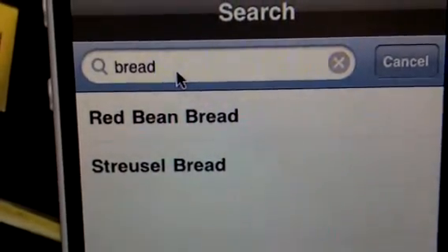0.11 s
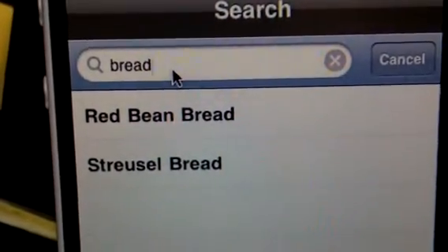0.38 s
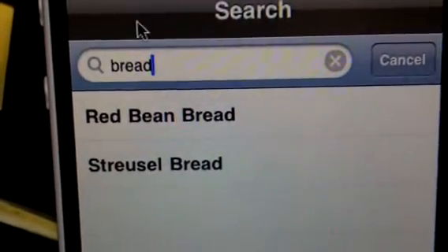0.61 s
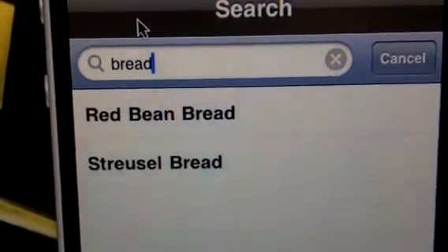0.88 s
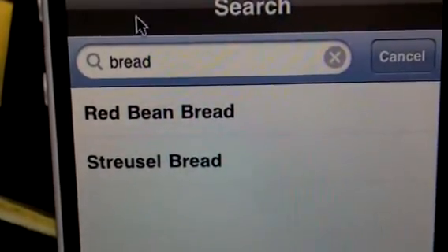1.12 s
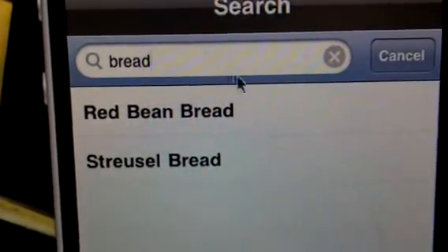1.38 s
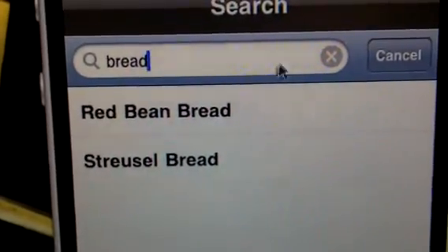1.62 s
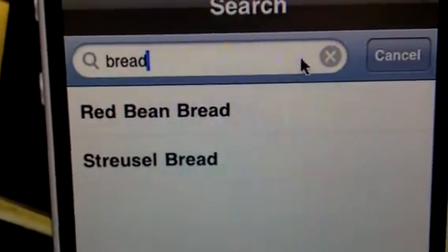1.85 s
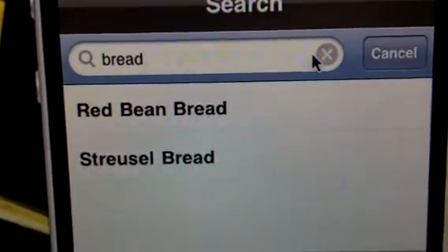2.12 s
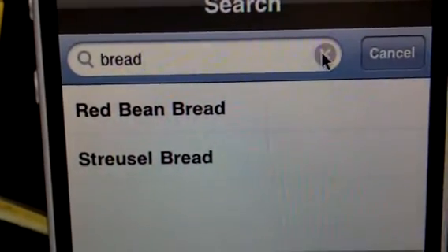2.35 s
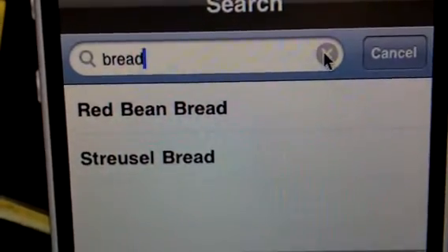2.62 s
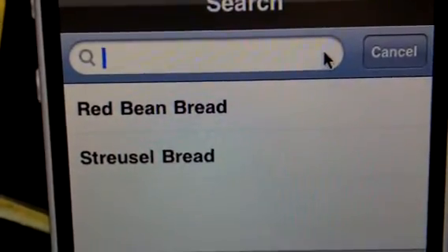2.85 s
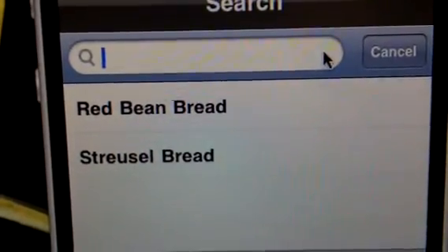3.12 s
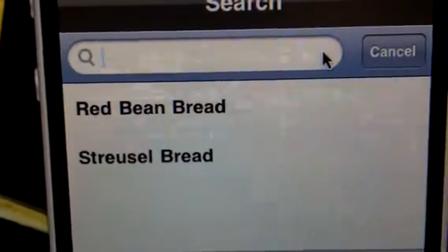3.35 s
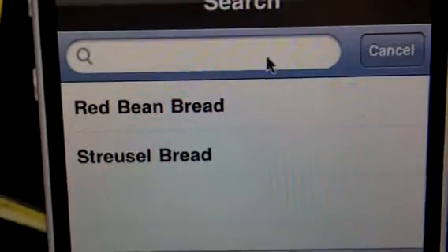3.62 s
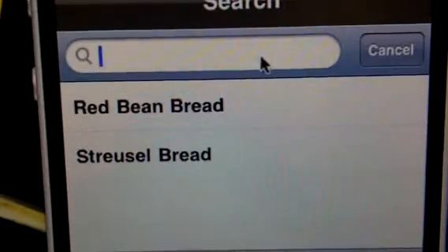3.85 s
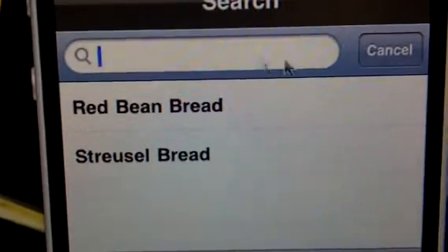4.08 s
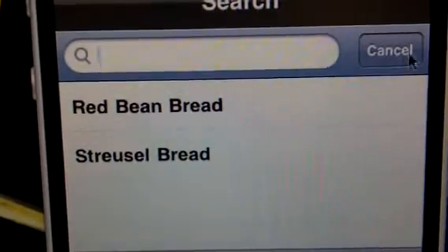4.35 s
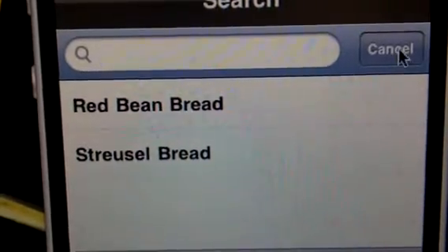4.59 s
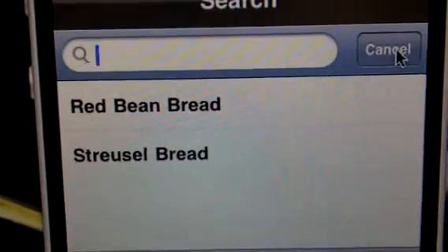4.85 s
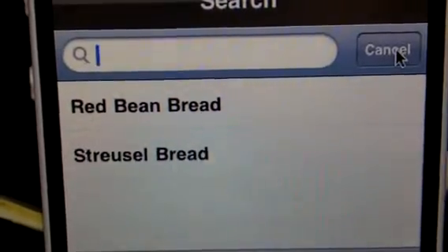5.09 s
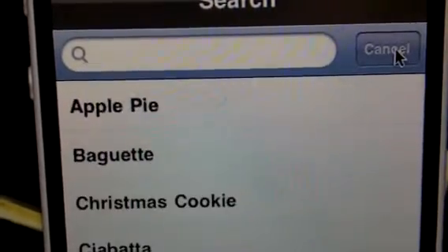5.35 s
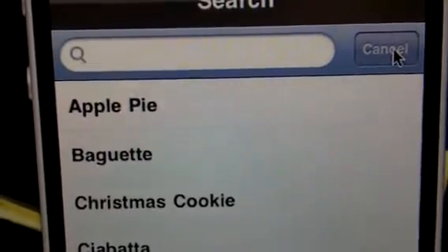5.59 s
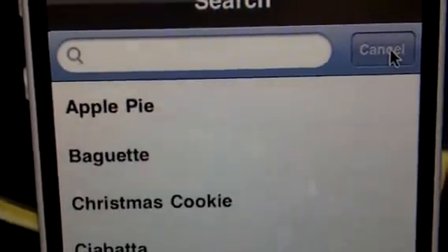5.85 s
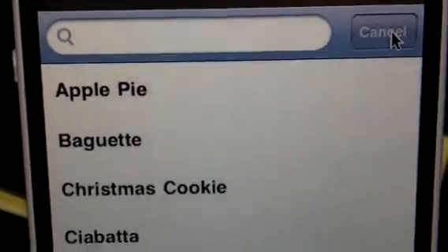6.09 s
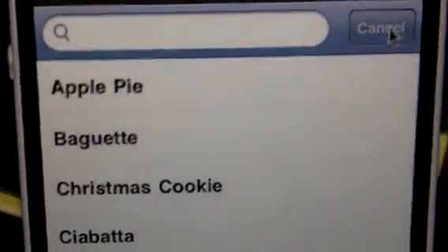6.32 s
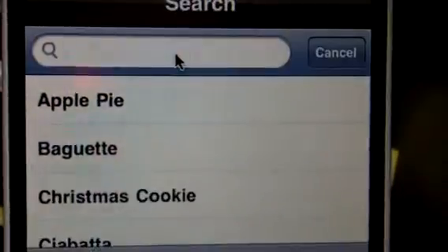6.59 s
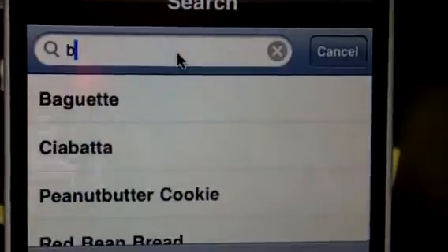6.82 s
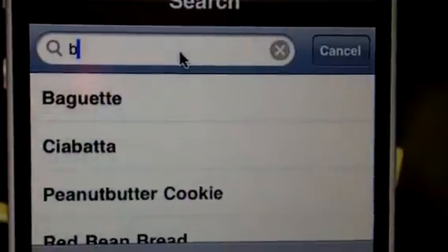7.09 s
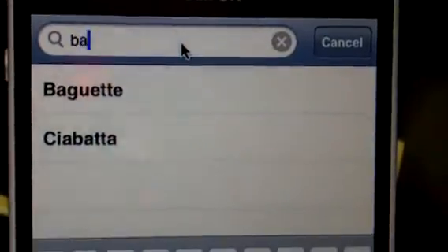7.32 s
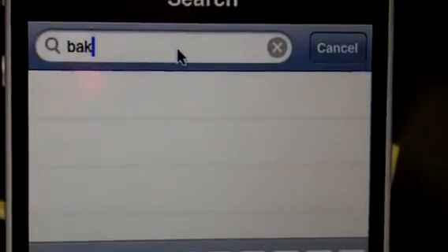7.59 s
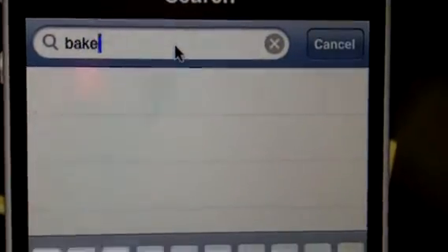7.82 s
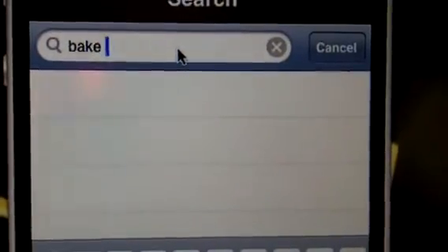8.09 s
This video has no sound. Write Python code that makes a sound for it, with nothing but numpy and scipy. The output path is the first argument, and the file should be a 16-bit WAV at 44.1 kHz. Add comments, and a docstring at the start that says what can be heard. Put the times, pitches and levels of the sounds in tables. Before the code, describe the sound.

A computer fan hums low in a quiet room while a mouse bumps and clicks, then after a brief total silence keys clatter and thump.

```python
"""Mouse and keyboard in a quiet room

A computer fan and mains tones, built from sines, hum over soft air shaped from random noise.
A mouse is nudged and clicked: short bursts of tiny contacts set its shell, switch and the desk ringing.
The sound is cut to silence for a moment, then keys are typed: loose caps chatter and each blow
thumps the desk under the microphone. A drag, faint rustles and a faint thin tone are heard too."""
import sys
import numpy as np
from scipy import signal
from scipy.fft import rfft, irfft
from scipy.io import wavfile
from scipy.ndimage import uniform_filter1d

SR = 44100
rng = np.random.default_rng(int(sys.argv[2]) if len(sys.argv) > 2 else 0)


def boost(x):
    """Linear amplitude factor 10**(x/20) for a level x in decibels (scalar or array-like)."""
    u = np.asarray(x, float) / 20
    return 10 ** u


def unload_audio(sound):
    """Save the sound as a 16-bit wav file, at the path given as the first command line argument."""
    columns = np.transpose(np.atleast_2d(sound))
    # keep every value between -1 and 1, then stretch to whole-number steps
    steps = np.round(np.clip(columns, -1, 1) * 32767)
    wavfile.write(sys.argv[1], SR, steps.astype(np.int16))


N = 361619
TIME = np.arange(N) / SR
CUT_S = (6.32392, 6.73990)   # sound off, sound on again
AFTER = TIME > CUT_S[1]


def rms_one(x):
    """Scale to an average strength (rms) of 1."""
    return x / np.sqrt(np.mean(x ** 2) + 1e-20)


def at_hz(points, hz):
    """Read a spectrum between its points, on a log-frequency axis."""
    known_hz, value = np.array(points).T
    return np.interp(np.log(hz), np.log(known_hz), value)


def drift(rate):
    """Random values of spread 1, this many per second, joined by straight lines."""
    knots = np.arange(0, TIME[-1] + 2 / rate, 1 / rate)
    return np.interp(TIME, knots, rng.standard_normal(len(knots)))


def ring(force, hz, t60):
    """A push sets a sine ringing, which falls 60 dB in t60 seconds; a unit click gives height 1."""
    r, w = boost(-60 / (t60 * SR)), 2 * np.pi * hz / SR
    return signal.lfilter([0, np.sin(w)], [1, -2 * r * np.cos(w), r * r], force + 1e-18)


def grains(size, per_s, spread_db):
    """Tiny contacts at random moments, with uneven strength and random sign."""
    born = rng.random(size) < per_s / SR
    strength = boost(spread_db * rng.standard_normal(size))
    return born * strength * rng.choice([-1, 1], size)


def rattle(length_s, per_s, rise_s, first_db):
    """Random bounces around one set contact; they set in quickly and die away (time constants)."""
    t = np.arange(1, SR // 20) / SR
    fade = (1 - np.exp(-t / max(rise_s, 1e-5))) * np.exp(-t / max(length_s, .001))
    first = boost(first_db) * (np.arange(len(t)) == round(rise_s * SR))
    return fade * (grains(size=len(t), per_s=per_s, spread_db=6.0) + first)


def strike(s, db, force, modes, tilt_db=0, scatter_db=3.5):
    """One blow rings every mode with a strength of its own; returns start sample and sound, peak at db."""
    force = np.pad(force, (0, SR // 2 - len(force)))
    middle_hz = modes[len(modes) // 2][0]
    sound = np.zeros(len(force))
    for hz, level_db, t60 in modes:
        extra_db = scatter_db * rng.standard_normal()
        tilted_db = tilt_db * np.log2(hz / middle_hz)   # tilt in dB per octave
        sound += boost(level_db + extra_db + tilted_db) * ring(force, hz, t60)
    return round(s * SR), boost(db) * sound / np.abs(sound).max()


def add(out, at, sound):
    """Mix a sound in at a sample."""
    out[at:at + len(sound)] += sound[:N - at]


def stroke(s, db, attack_s, hold_s, t60):
    """Loudness curve: rise, hold, then an exponential fall of 60 dB in t60 seconds."""
    t = TIME - s
    fall_s = np.maximum(t - attack_s - hold_s, 0)
    return np.clip(t / attack_s, 0, 1) ** 2 * boost(db - 60 * fall_s / t60)


def rub(envelope, modes, per_s):
    """Dense contacts ring a body; the envelope sets how loud."""
    force = grains(size=N, per_s=per_s, spread_db=3.5)
    body = sum(boost(db) * ring(force, hz, t60) for hz, db, t60 in modes)
    return rms_one(body) * envelope


# strength of the air noise: f/Hz, level/dB (per Hz)
AIR_SPECTRUM = [(6, -51), (14, -54), (22, -47), (31, -62), (45, -69.5), (110, -68), (200, -77),
                (375, -79.5), (1000, -86.5), (2400, -95.5), (3200, -105), (5300, -103), (6500, -97),
                (8500, -101), (11000, -102.5)]
# how alike left and right are: f/Hz, likeness/1
EAR_LIKENESS = [(60, 0.99), (140, 0.92), (340, 0.96), (800, 0.98), (1880, 0.72), (4460, 0.75),
                (10600, 0.41)]
# change of the air noise after the pause: f/Hz, level/dB
AIR_CHANGE = [(20, -1), (60, 1.5), (150, -2.5), (1000, 0), (3000, 0.5), (5300, -1), (7000, 0), (11000, 0.5)]


def air():
    """Smooth air noise is random noise with a shaped spectrum, alike in both ears in the bass."""
    hz = np.maximum(np.fft.rfftfreq(N, 1 / SR), 1)
    mid, side = rfft(rng.standard_normal((2, N)))
    alike = np.clip(at_hz(EAR_LIKENESS, hz), 0, .99)
    pair = np.sqrt((1 + alike) / 2) * mid + np.sqrt((1 - alike) / 2) * side * [[1], [-1]]
    before = pair * boost(at_hz(AIR_SPECTRUM, hz)) * np.sqrt(SR / 2)
    after = before * boost(at_hz(AIR_CHANGE, hz))
    noise = np.where(AFTER, irfft(after, N), irfft(before, N))
    return noise * boost(.5 * drift(9.0))


def tones(cycles, rows, waver_db):
    """Sines at multiples of a cycle count; their level wavers a little and changes at the pause."""
    total = np.zeros(N)
    for multiple, before_db, after_db in rows:
        level = boost(np.where(AFTER, after_db, before_db) + waver_db * drift(3.043))
        total += np.sqrt(2) * level * np.sin(2 * np.pi * (multiple * cycles + rng.random()))
    return total


# multiples of the fan's turning rate: multiple/1, level/dB before the pause, level/dB after it
FAN_TONES = [(4, -43.5, -46), (5, -54, -58), (6, -54, -62), (8, -59, -64), (9, -61, -64), (10, -66, -66),
             (11, -67, -74), (12, -62, -74), (15, -82, -72), (20, -74, -80), (31, -86, -73), (33, -72, -84),
             (37, -71, -84), (49, -75, -88), (53, -76, -88), (68, -80, -78), (72, -92, -78)]


def fan():
    """A turning fan hums at multiples of its turning rate, which wanders slightly."""
    before_hz, after_hz = 27.16, 28.56   # turns per second around the pause
    rate = np.where(AFTER, after_hz, before_hz) * (1 + 0.000762 * drift(1.5))
    return tones(np.cumsum(rate) / SR, FAN_TONES, waver_db=2.0)


# mains hum and whine: f/Hz, level/dB before the pause, level/dB after it
ELECTRICAL_TONES = [(58.8, -39.5, -50), (119.8, -48, -56), (240.2, -67, -75), (1440, -90, -71),
                    (6622.8, -71, -75), (7867, -82, -90), (8451.8, -85, -80)]


def electrical_tones():
    """Mains and whine are sines of steady pitch."""
    return tones(TIME, ELECTRICAL_TONES, waver_db=2.5)


def faint_tone():
    """A thin, unsteady tone is a sine that slides up a little."""
    s, attack_s, hold_s = 4.87, .03, .15
    hz = np.interp(TIME, (s, s + attack_s + hold_s), (1620, 1645))
    tone = np.sqrt(2) * np.sin(2 * np.pi * np.cumsum(hz) / SR)
    return tone * boost(2.5 * drift(30.0)) * stroke(s, -66, attack_s, hold_s, t60=.15)


# ringing of the dragged thing: f/Hz, level/dB (relative), time to fall 60 dB t/s
DRAG_RINGING = [(653, -16, 0.062), (775, -5.5, 0.13), (882, 1, 0.043), (1118, -6, 0.042), (1390, -6, 0.021),
                (1623, -5.5, 0.024), (2024, -15.5, 0.017), (2630, -4, 0.0071), (3600, -11.5, 0.02),
                (5230, -10, 0.0039), (6500, -39, .004)]


def drag():
    """Something dragged over the desk makes many small contacts that keep it ringing."""
    return rub(stroke(.026, -35, attack_s=.014, hold_s=.03, t60=.12), DRAG_RINGING, per_s=2100)


# faint bright rustles: start t/s, level/dB, attack t/s, hold t/s, time to fall 60 dB t/s
RUSTLE_STROKES = [(6.0, -55, .07, .01, .2), (6.1, -63, .08, .2, .2)]


def rustles():
    """A faint bright rustle and a weaker one: dense contacts with the ringing of the key caps."""
    envelope = sum(stroke(*row) for row in RUSTLE_STROKES)
    return rub(envelope, CAP_RINGING, per_s=3900)


# mouse bumps on the desk: t/s, dull level/dB, woody level/dB, bright level/dB, rattle decay t/s
MOUSE_BUMPS = [(0.486, -38, -42, -57, 0.0072), (0.911, -35.5, -48, -50.5, 0.0088),
               (1.162, -40, -38.5, -72, 0.0077), (2.005, -34, -28.5, -43, 0.006),
               (4.166, -29.5, -24.5, -35, 0.021), (4.526, -49, -33, -46, 0.007),
               (6.251, -45, -30.5, -31.5, 0.012)]
# dull part of a bump: f/Hz, level/dB (relative), time to fall 60 dB t/s
DULL_RINGING = [(436, -4.5, 0.049), (500, -8.5, 0.14), (690, -1.5, 0.017)]
# woody part of a bump: f/Hz, level/dB (relative), time to fall 60 dB t/s
WOODY_RINGING = [(846, 4.5, 0.0085), (1138, -0.5, 0.034), (1490, -5, 0.017), (1734, 2.5, 0.021),
                 (2150, 0, 0.0074), (2480, -4, 0.0063), (2900, -5, 0.0068), (3640, -2, 0.0067)]


def mouse_bumps():
    """The mouse body rattles against the desk; one force rings dull, woody and bright parts."""
    out = np.zeros(N)
    for s, dull_db, woody_db, bright_db, length_s in MOUSE_BUMPS:
        force = rattle(length_s, per_s=1500, rise_s=.0007, first_db=2.0)
        add(out, *strike(s, dull_db, force, DULL_RINGING))
        add(out, *strike(s, woody_db, force, WOODY_RINGING))
        # bumps sound duller than clicks: the bright part is tilted down towards the top
        add(out, *strike(s, bright_db, force, SWITCH_RINGING, tilt_db=-4.5))
    return out


# mouse button presses: t/s, shell knock level/dB
BUTTON_PRESSES = [(2.564, -26.5), (5.077, -27)]
# hollow mouse shell: f/Hz, level/dB (relative), time to fall 60 dB t/s
SHELL_RINGING = [(224, -12, 0.033), (317, 5, 0.0098), (431, 9, 0.019), (493, -10.5, 0.083),
                 (647, -1, 0.033), (987, -13, 0.016)]
# bright button switch: f/Hz, level/dB (relative), time to fall 60 dB t/s
SWITCH_RINGING = [(3510, -23, 0.0039), (4810, -4, 0.011), (5450, 2, 0.0094), (5570, 1.5, 0.009),
                  (6400, -1.5, 0.0065), (6530, -2.5, 0.0036), (7950, -8.5, 0.0042), (8400, -22, .005),
                  (9900, -16.5, 0.0044)]


def mouse_clicks():
    """A button knocks its hollow shell and ticks its bright switch, on the press and on springing back."""
    held_s, release_db = .1125, 3   # the button springs back this much later and louder
    out = np.zeros(N)
    soft = np.hanning(round(0.0012 * SR))   # the shell is pushed, not ticked

    def click(s, shell_db, tick_db):
        """One shell knock, with a switch tick tick_db relative to it."""
        knock = np.convolve(rattle(0.0088, per_s=730, rise_s=0.00014, first_db=4.0), soft)
        tick = rattle(0.018, per_s=3000, rise_s=0.00023, first_db=7.5)
        add(out, *strike(s, shell_db, knock, SHELL_RINGING))
        add(out, *strike(s + 0.00082, shell_db + tick_db, tick, SWITCH_RINGING))

    for press_s, db in BUTTON_PRESSES:
        click(press_s, db, tick_db=-9)
        click(press_s + held_s, db + release_db, tick_db=-7.5)
    return out


# key caps rattling: t/s, level/dB (before the filter), tilt towards the top level/dB (per octave)
CAP_RATTLES = [(6.774, -38.5, 19), (6.887, -36, 1), (7.197, -29, 22), (7.221, -35.5, 3), (7.421, -39.5, 11),
               (7.4432, -33.5, 3), (7.619, -32.5, 1), (7.776, -42, 3), (7.865, -16, 4), (7.884, -17.5, -23),
               (8.01, -13, -5)]
# plastic key caps: f/Hz, level/dB (relative), time to fall 60 dB t/s
CAP_RINGING = [(5200, -18, 0.0063), (5570, -7.5, 0.034), (6206, 4.5, 0.0064), (6720, 2.5, 0.022),
               (6720, -2, 0.0077), (7240, 2, 0.016), (7460, -0.5, 0.0098), (8280, -7, 0.016),
               (8950, -13.5, 0.0064), (10500, -28, 0.0059)]


def key_caps():
    """Loose caps chatter briefly; too small to radiate bass, and soft plastic dulls the very top."""
    out = np.zeros(N)
    for s, db, tilt_db in CAP_RATTLES:
        chatter = rattle(0.0051, per_s=9100, rise_s=0.0061, first_db=9.5)
        add(out, *strike(s, db, chatter, CAP_RINGING, tilt_db))
    return signal.sosfilt(signal.butter(5, (4500, 10000), "band", fs=SR, output="sos"), out)


# keys bottoming out on the desk: t/s, panel level/dB, deep level/dB (before the filter)
KEY_THUMPS = [(6.776, -18, -30), (6.889, -22, -23.5), (7.198, -35.5, -26), (7.222, -24, -18),
              (7.425, -31, -19.5), (7.45, -38, -21), (7.471, -26, -23.5), (7.619, -30, -25),
              (7.639, -35.5, -27.5), (7.777, -42, -30), (7.863, -29.5, -43), (7.888, -10.5, -23),
              (8.013, -7, -38)]
# desk panel: f/Hz, level/dB (relative), time to fall 60 dB t/s
PANEL_RINGING = [(124.3, -6.5, 0.19), (136.7, 1, 0.24), (156, -6.5, 0.17), (199, -11.5, 0.35)]
# deep part of the desk: f/Hz, level/dB (relative), time to fall 60 dB t/s
DEEP_RINGING = [(77.4, -1, 0.12), (100.6, 6, 0.12)]
# keyboard case: f/Hz, level/dB (relative), time to fall 60 dB t/s
CASE_RINGING = [(203, -9, .1), (275, -13, 0.13), (335, -1.5, 0.14), (403, -10.5, 0.038), (463, 4.5, 0.084),
                (540, -2.5, 0.072)]


def desk():
    """A blow knocks the case and reaches the desk through springy feet; close panel modes beat."""
    out, knock = np.zeros(N), np.hanning(round(0.0021 * SR))
    # rubber feet act as a spring between keyboard and desk
    push = ring(np.pad(knock, (0, SR // 10)), hz=132.5, t60=0.031)
    hard_blow_db, case_fall = -12.5, 4.9   # below a hard blow the case fades by 4.9 dB per dB
    for s, panel_db, deep_db in KEY_THUMPS:
        case_db = -25.5 - case_fall * max(hard_blow_db - panel_db, 0)
        add(out, *strike(s, panel_db, push, PANEL_RINGING, scatter_db=2.5))
        add(out, *strike(s, deep_db, push, DEEP_RINGING, scatter_db=2.4))
        add(out, *strike(s + 0.0026, case_db, knock, CASE_RINGING))
    # the desk radiates no sub-bass
    return signal.sosfilt(signal.butter(2, 55, "high", fs=SR, output="sos"), out)


def room(x):
    """Short tail of scattered reflections, partly unlike in the two ears; falls 60 dB in 0.15 s."""
    t = np.arange(SR // 2) / SR
    shared, own = rng.standard_normal(len(t)), rng.standard_normal((2, len(t)))
    tail = (shared + 0.5 * own) * boost(-60 * t / .15) * (t > .003)
    tail /= np.sqrt(np.sum(tail[0] ** 2))
    return signal.fftconvolve(x[None], tail, axes=1)[:, :N]


def scene():
    """All sources in the room; mouse, key caps, drag and rustles also sound in its reflections."""
    background = air() + fan() + electrical_tones() + faint_tone()
    near = drag() + rustles() + mouse_bumps() + mouse_clicks() + key_caps()
    return background + near + boost(-9) * room(near) + desk()


# threshold below which a narrow band is dropped: f/Hz, level/dB (per Hz)
GATE_THRESHOLD = [(1000, -106), (3000, -102.5), (5500, -102), (6500, -99), (8500, -100.5), (11000, -101.5)]


def gate(x):
    """Narrow bands under a flickering threshold are dropped frame by frame; loud frames raise it."""
    knee_db, slope, flicker_spread_db = -32, 1, 1.3   # above the knee it rises 1 dB per dB
    hz, _, z = signal.stft(x, SR, "hann", nperseg=2048, scaling="psd")
    power = 2 * np.mean(np.abs(z) ** 2, axis=0)
    loud_db = 10 * np.log10(power[hz > 60].sum(axis=0) * hz[1] + 1e-20)
    band_db = 10 * np.log10(uniform_filter1d(power, size=4, axis=0).clip(1e-20))
    groups = np.arange(len(hz)) // 8   # eight lines share one flicker
    flicker_db = flicker_spread_db * rng.standard_normal(power.shape)[groups]
    raised_db = slope * np.maximum(loud_db - knee_db, 0)
    keep = band_db > at_hz(GATE_THRESHOLD, hz + 1)[:, None] + raised_db + flicker_db
    return signal.istft(z * keep, SR, "hann", nperseg=2048, scaling="psd")[1][:, :N]


def low_pass(x):
    """Removes everything above the highest recorded frequency."""
    return signal.sosfilt(signal.butter(12, 11150, fs=SR, output="sos"), x)


def record(dry):
    """Band-stop around 4 kHz, band gate, converter offset, the cut to silence with its step, and top cut."""
    # a steep band-stop leaves almost nothing from 3.8 to 4.4 kHz
    band_stop = signal.cheby2(3, 30, (3828, 4399), "bandstop", fs=SR, output="sos")
    heard = gate(signal.sosfilt(band_stop, dry))
    live = uniform_filter1d(1. * ((TIME < CUT_S[0]) | AFTER), size=3)   # the cut takes a few samples
    step = .028 * ((TIME > 6.45457) & (TIME < 6.65457))   # a silent offset step inside the pause
    offset = np.array([[.0595], [.0755]])   # converter offset left, right
    edited = (heard + offset) * live + step
    top_cut = signal.cheby1(8, .1, 10720, fs=SR, output="sos")
    finished = signal.sosfiltfilt(top_cut, edited)
    return low_pass(finished)


dry = scene()
out = record(dry)
unload_audio(out)
```